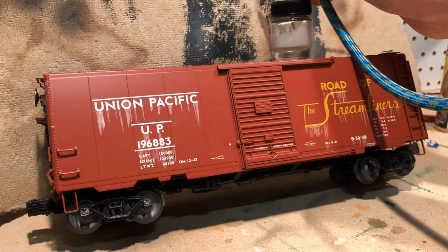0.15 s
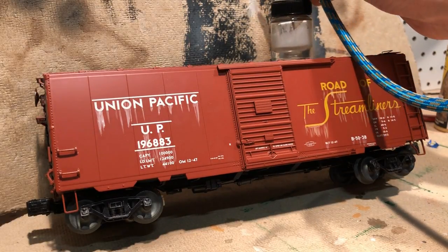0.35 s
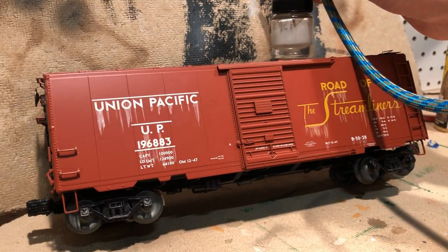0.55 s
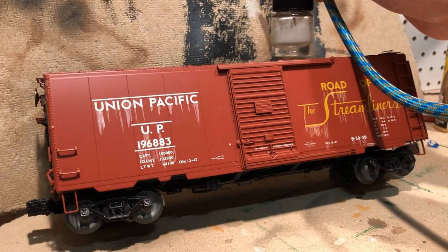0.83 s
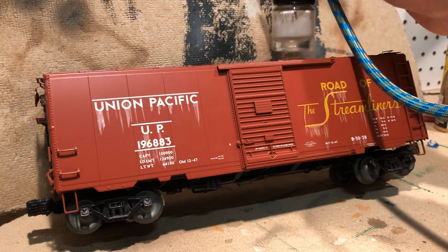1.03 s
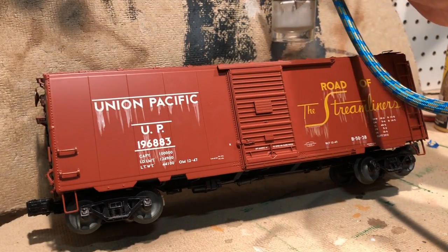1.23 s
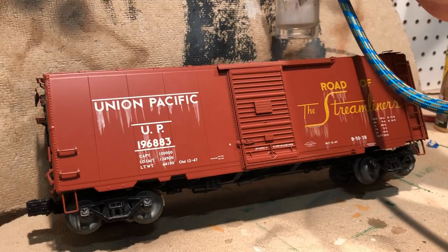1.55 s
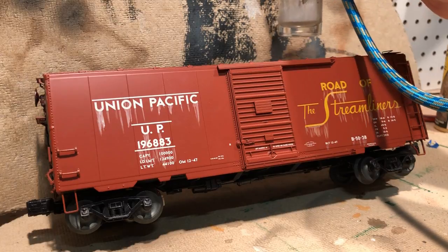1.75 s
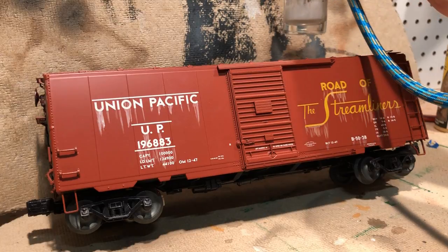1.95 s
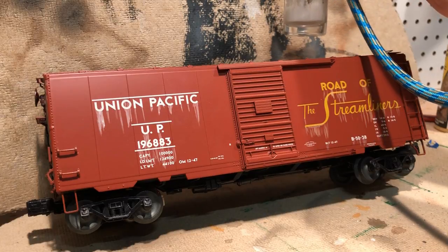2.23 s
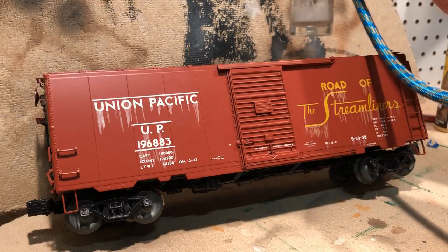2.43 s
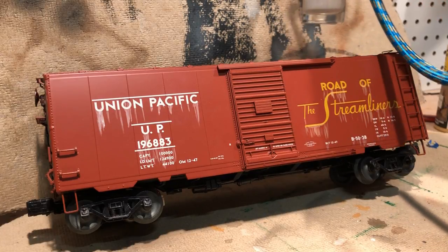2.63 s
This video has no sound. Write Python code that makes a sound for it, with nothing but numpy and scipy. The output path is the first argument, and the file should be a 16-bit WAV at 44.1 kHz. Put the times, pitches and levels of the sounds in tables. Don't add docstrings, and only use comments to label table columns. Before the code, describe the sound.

An airbrush spits eight short, sharp hisses of air while a small compressor hums steadily behind.

```python
import sys
import numpy as np
from scipy import signal
from scipy.fft import rfft, irfft
from scipy.io import wavfile
from scipy.ndimage import uniform_filter1d

SR = 44100
rng = np.random.default_rng(int(sys.argv[2]) if len(sys.argv) > 2 else 0)


def nominal_scale(level):
    x = np.asarray(level, float) / 20
    return 10 ** x


def to_wav(sig):
    pcm = np.clip(np.atleast_2d(sig), -1, 1) * 32767
    pcm = np.round(pcm).astype(np.int16)
    wavfile.write(sys.argv[1], SR, pcm.T)


N = 123479


def set_level(x, level_db):
    return x * nominal_scale(level_db) / np.sqrt(np.mean(x ** 2))


def spectrum_gain(points):
    hz, db = np.array(points, float).T
    log_bins = np.log(np.arange(N // 2 + 1) * SR / N + 1)
    log_hz = np.log(np.r_[hz[0] * .7, hz, hz[-1] * 1.3])
    return nominal_scale(np.interp(log_bins, log_hz, np.r_[-60, db, -60]))


def resonance_power(resonances):
    bins = np.arange(N // 2 + 1) * SR / N
    return sum(nominal_scale(db) ** 2 / (1 + (2 * (bins - hz) / width) ** 6) for hz, width, db in resonances)


def noise(gain):
    spectrum = rfft(rng.standard_normal(N)) * gain
    return set_level(irfft(spectrum, N), 0)


def wander(rate_hz):
    knots = np.arange(int(N / SR * rate_hz * 2) + 3)
    values = uniform_filter1d(rng.standard_normal(len(knots)), size=2)
    return 1.43 * np.interp(np.arange(N) / SR * rate_hz * 2, knots, values)


def valve(t, start_s, length_s, open_s, shut_s, leak_db=-24):
    leak = nominal_scale(leak_db + 900 * np.minimum(t - start_s, 0))
    opening = np.clip((t - start_s) / open_s, 0, 1)
    closing = np.clip((start_s + length_s + shut_s / 2 - t) / shut_s, 0, 1) ** 2
    return np.maximum(opening, leak) * closing


# time_s [s], crank_hz [Hz]
CRANK_SPEED = [(0, 27.41), (.45, 27.4), (.6, 27.335), (1.3, 27.33), (1.5, 27.35), (2.25, 27.34),
               (2.45, 27.24), (2.8, 27.21)]
# multiple [of crank rate], level_db [dB]
CRANK_ORDERS = [(1, -32), (2, -19.5), (3, -0.5), (4, -8.5), (5, -0.5), (6, -1.5), (7, -24), (8, -15),
                (9, -13.5), (10, -11.5), (11, -11.5), (12, -27.5), (13, -10.5), (14, -23.5), (15, -17.5),
                (16, -13), (17, -23.5), (18, -18), (19, -20.5), (20, -25), (21, -23), (22, -14.5),
                (23, -39), (24, -9.5), (25, -22.5), (26, -26.5), (27, -22), (28, -26), (29, -19.5),
                (30, -31)]
# pitch_hz [Hz], level_db [dB]
CASING_LINES = [(872.1, -75), (925.9, -74), (952.8, -68), (1007, -69.5), (1061, -80), (1087, -87),
                (1120, -92), (1174, -78), (1254, -85), (1389, -75.5)]
# pitch_hz [Hz], width_hz [Hz], level_db [dB]
FAN_RINGS = [(2200, 430, -70), (2530, 82, -71.5), (3770, 61, -70.5), (4950, 400, -75), (14300, 1500, -63),
             (15500, 600, -63)]
# time_s [s], level_db [dB]
HAND_SHADE = [(0, 0.5), (.3, -9), (.55, -1), (1.6, -1.5), (2.1, 0), (2.5, 3), (2.8, 1.5)]
# pitch_hz [Hz], density_db [dB per Hz]
BENCH_RUMBLE = [(25, -14), (60, 2), (150, 6), (400, -4.5), (650, -3.5), (950, -7), (1300, -8), (1700, -21)]
# time_s [s], level_db [dB]
BENCH_SWELL = [(0, 3.5), (.3, 9), (.6, 2), (1.4, 1), (1.8, 4.5), (2.2, 0.5), (2.5, -4), (2.8, 2)]


def compressor(t):
    crank_hz, hum_db = 27.34, -50.5
    turn = 2 * np.pi * np.cumsum(np.interp(t, *np.array(CRANK_SPEED).T)) / SR
    turn = turn - np.interp(1.4877, t, turn)
    lines = [(round(k), db + hum_db) for k, db in CRANK_ORDERS]
    lines += [(round(hz / crank_hz), db) for hz, db in CASING_LINES]
    shade = nominal_scale(np.interp(t, *np.array(HAND_SHADE).T))
    hum = 0
    for (k, db), chance in zip(lines, rng.standard_normal(len(lines))):
        is_ring = k > 20
        if k < 7:
            phase = -2.64 - 2 * np.pi * .392 * k + np.pi * (k > 4)
        else:
            scatter_rad = 0.058 * (k - 8) * (3 if is_ring else 1)
            phase = .55 + chance * scatter_rad
        flicker = 1 + 0.081 * min(k / 12, 2) * wander(6.94)
        line_gain = np.sqrt(2) * nominal_scale(db) * flicker * (shade if is_ring else 1)
        hum = hum + line_gain * np.cos(k * turn + phase)
    density = [(hz, width, db - 10 * np.log10(width)) for hz, width, db in FAN_RINGS]
    ring_rms = np.sqrt(sum(nominal_scale(db) ** 2 for _, _, db in FAN_RINGS))
    fan = noise(np.sqrt(resonance_power(density))) * ring_rms
    swell_db = np.interp(t, *np.array(BENCH_SWELL).T)
    return hum + fan + nominal_scale(-60 + swell_db) * noise(spectrum_gain(BENCH_RUMBLE))


# pitch_hz [Hz], density_db [dB per Hz]
BACKGROUND = [(650, -13), (1100, -4), (1240, -13.5), (2060, -10.5), (2600, -12.5), (4810, -12),
              (5820, -15.5), (14200, -7.5), (15900, -13)]


def background():
    return nominal_scale(-55 - 1) * noise(spectrum_gain(BACKGROUND))


# start_s [s], length_s [s], level_db [dB], roar_db [dB against hiss], leak_db [dB ahead of opening]
SPRAYS = [
    (0.017, 0.09, -23.5, -22.5, -25),
    (0.1, 0.28, -18.5, -23.5, -24),
    (0.586, .181, -19, -22, -32),
    (0.896, 0.15, -20.5, -19, -19.5),
    (1.153, 0.17, -21.5, -17, -22),
    (1.369, 0.21, -22.5, -15, -29),
    (1.716, .176, -23.5, -15, -23),
    (1.957, 0.17, -23.5, -16, -30),
    (2.597, 0.14, -23.5, -16, -24),
]
# pitch_hz [Hz], width_hz [Hz], level_db [dB]
AIM_1 = [(3480, 780, -17.5), (5970, 900, -9.5), (6700, 800, -5.5), (8700, 700, -6), (10400, 1500, -3.5),
         (11800, 700, 0), (13300, 900, 1.5), (14000, 700, 0), (15500, 1000, -1)]
AIM_2 = [(3540, 450, -16), (5950, 890, -6), (6770, 1100, -2), (8470, 740, -7.5), (9600, 770, -2),
         (10500, 950, -2), (11800, 1050, 0.5), (13060, 880, 4), (14500, 1200, -1), (15700, 600, -1.5)]
AIM_3 = [(3540, 520, -15.5), (4980, 620, -15), (5880, 870, -5), (6660, 1160, -2.5), (8400, 810, -8.5),
         (9500, 600, 0), (10500, 1000, -1.5), (11660, 800, -1), (13000, 950, 1), (14300, 1000, -5),
         (15500, 600, -1.5)]
AIM_4 = [(3390, 740, -12), (5360, 1100, -5), (6470, 1400, -2), (8300, 670, -6), (9370, 850, 0.5),
         (10400, 780, 0), (11400, 800, -5), (12600, 1100, 1.5), (14700, 900, 0), (15800, 650, 1.5)]
AIM_5 = [(3040, 600, -12), (4100, 600, -11), (5070, 640, -5), (6100, 1500, -5.5), (8600, 900, -3.5),
         (9430, 1200, -1), (11200, 1200, -5.5), (12600, 1100, 1.5), (14200, 1250, 2), (15500, 900, 1)]
AIM_6 = [(3980, 700, -12.5), (5160, 1000, -8), (6300, 660, -5.5), (7340, 600, -10.5), (8540, 620, -2),
         (9440, 800, -2.5), (10800, 900, -5.5), (12240, 1200, 1), (13700, 800, -2), (15100, 1100, -2)]
AIM_7 = [(4040, 500, -12.5), (5070, 970, -9.5), (6200, 760, -6.5), (7300, 600, -11), (8700, 940, -2),
         (9570, 700, -3.5), (10700, 600, -7), (12120, 1100, 1), (13000, 800, -3), (14900, 1300, -3)]
AIM_8 = [(4100, 560, -15), (5570, 1300, -8.5), (6430, 770, -7.5), (7300, 600, -10.5), (8800, 900, -2),
         (9700, 900, -3.5), (10660, 600, -3.5), (12100, 1250, 4), (13000, 800, 0.5), (14700, 700, -1),
         (15600, 600, -1)]
AIM_9 = [(3900, 900, -13), (5600, 1100, -10.5), (6900, 1200, -3.5), (8470, 570, -2), (9930, 1400, 0),
         (11730, 1060, 4), (13500, 800, -2), (14400, 900, -3), (15400, 800, 0.5)]
# pitch_hz [Hz], density_db [dB per Hz]
BARE_JET = [(4300, -32), (5250, -24), (5600, -12), (6500, -3), (8000, -2), (9500, -1), (12500, 2),
            (15700, -4)]
# pitch_hz [Hz], density_db [dB per Hz]
JET_ROAR = [(450, -17.5), (900, -13), (1300, -11.5), (1900, -4.5), (2600, -2.5), (3200, 0), (4400, -1),
            (5400, -2.5), (6200, -8.5)]
# pitch_hz [Hz], density_db [dB per Hz]
TRAPPED_AIR = [(1200, -24), (2500, -15), (4500, -6), (6000, -5), (8000, -3), (11000, 0), (14000, -1),
               (15800, -6)]
# time_s [s], level_db [dB]
FINGER_PRESSURE = [(.26, 0), (.28, 1), (.3, -4), (.334, -2), (.356, 0.5), (1.72, -1.5), (1.83, -1),
                   (1.86, -0.5), (1.92, 0.5), (2.6, -0.5), (2.74, -1.5)]


def airbrush(t):
    open_s, shut_s, bleed_t60_s = 0.0087, 0.011, .12
    aims = (AIM_1, AIM_2, AIM_3, AIM_4, AIM_5, AIM_6, AIM_7, AIM_8, AIM_9)
    jet_power = (spectrum_gain(BARE_JET) * nominal_scale(-7.5)) ** 2
    roar = noise(spectrum_gain(JET_ROAR))
    bleed = noise(spectrum_gain(TRAPPED_AIR)) * nominal_scale(-16.5 + 2 * wander(60))
    out = 0
    for (start_s, length_s, level_db, roar_db, leak_db), aim in zip(SPRAYS, aims):
        hiss = noise(np.sqrt(resonance_power(aim) + jet_power))
        flow = valve(t, start_s, length_s, open_s, shut_s, leak_db)
        after = t - start_s - length_s
        emptying = (after > -shut_s / 2) * nominal_scale(-60 * np.maximum(after, 0) / bleed_t60_s)
        out = out + nominal_scale(level_db) * (flow * (hiss + nominal_scale(roar_db) * roar) + bleed * emptying)
    pressure_db = np.interp(t, *np.array(FINGER_PRESSURE).T)
    return out * nominal_scale(pressure_db + 0.44 * wander(45.3))


def room(x, t):
    room_db, t60_s, dull_hz = -9, .23, 2200
    age = t[:SR // 2]
    tail = rng.standard_normal(len(age)) * nominal_scale(-60 * age / t60_s) * (age > .003)
    tail = tail / np.sqrt(np.sum(tail ** 2))
    dull = signal.lfilter(*signal.butter(1, dull_hz, fs=SR), x)
    return signal.fftconvolve(dull, tail)[:N] * nominal_scale(room_db)


# pitch_hz [Hz], density_db [dB per Hz]
TRIGGER_CRACK = [(1200, -25), (1800, 9), (2400, -7), (6000, -4), (9000, 4), (15500, -2)]
# pitch_hz [Hz], level_db [dB], t60_s [s]
TRIGGER_MODES = [(1910, -44, .016), (2520, -45, 0.011), (4600, -43, .01), (5370, -41, 0.011)]


def tick(t):
    hit_s, crack_t60_s, tail_t60_s = .4946, 0.0073, .04
    age = np.maximum(t - hit_s, 0)
    fade = nominal_scale(-60 * age / crack_t60_s) + nominal_scale(-15 - 60 * age / tail_t60_s)
    crack = noise(spectrum_gain(TRIGGER_CRACK)) * nominal_scale(-28) * fade
    body = sum(nominal_scale(db - 60 * age / t60_s) * np.sin(2 * np.pi * hz * age) for hz, db, t60_s in TRIGGER_MODES)
    return (crack + body) * (t >= hit_s)


# start_s [s], length_s [s], level_db [dB]
SEEPS = [
    (0.856, 0.029, -54),
    (2.13, 0.33, -53.5),
    (2.56, .04, -58),
]
# pitch_hz [Hz], density_db [dB per Hz]
SEEP_SPECTRUM = [(2940, -43), (5000, -15), (5530, -19), (5620, -13), (8640, -5.5), (10400, -10),
                 (12800, -8), (13800, -4), (15900, -7)]


def seep(t):
    air = noise(spectrum_gain(SEEP_SPECTRUM)) * nominal_scale(0.9 * wander(20))
    flow = sum(nominal_scale(db) * valve(t, start_s, length_s, open_s=0.03, shut_s=0.017)
               for start_s, length_s, db in SEEPS)
    return air * flow


def scene():
    t = np.arange(N) / SR
    near = airbrush(t) + tick(t)
    mono = near + room(near, t) + seep(t) + compressor(t) + background()
    return np.array([mono, mono])


def roll_off(x):
    return signal.sosfilt(signal.butter(12, 16830, fs=SR, output="sos"), x)


def record(dry):
    low_pass = signal.ellip(14, .2, 80, 15720, fs=SR, output="sos")
    finished = signal.sosfilt(low_pass, dry)
    return roll_off(finished)


dry = scene()
out = record(dry)
to_wav(out)
```